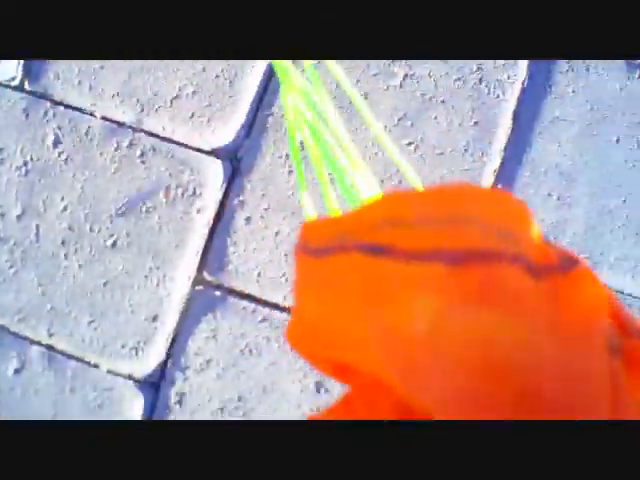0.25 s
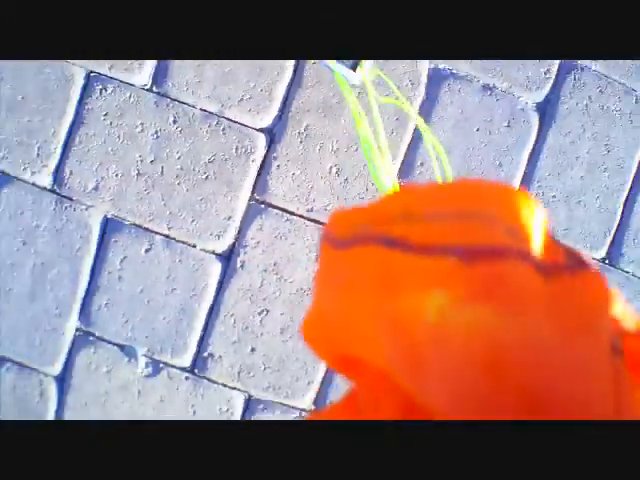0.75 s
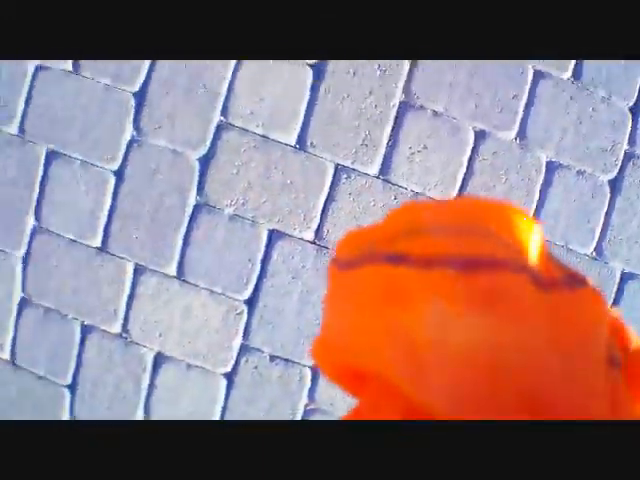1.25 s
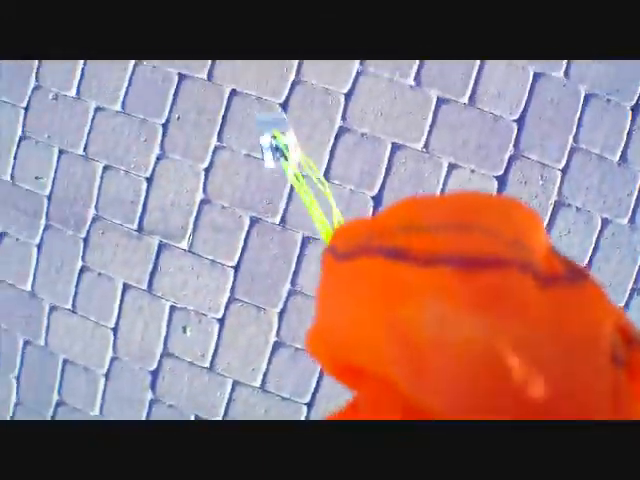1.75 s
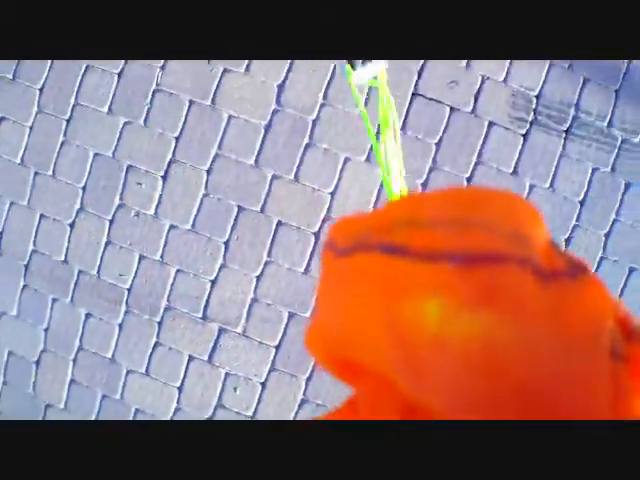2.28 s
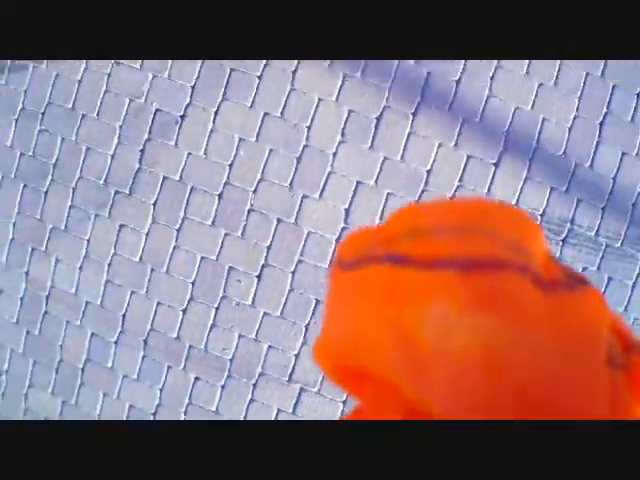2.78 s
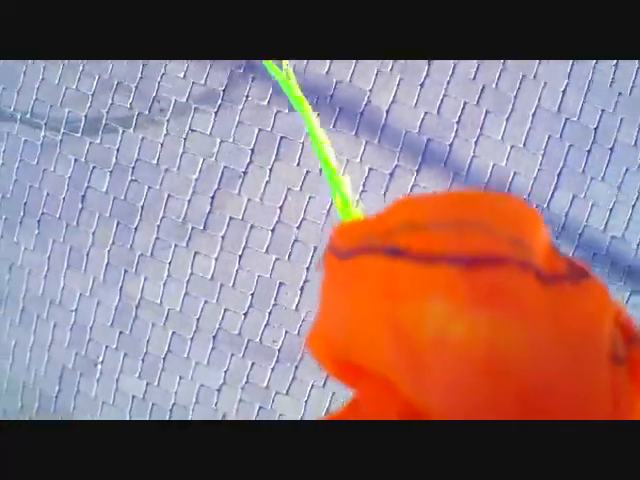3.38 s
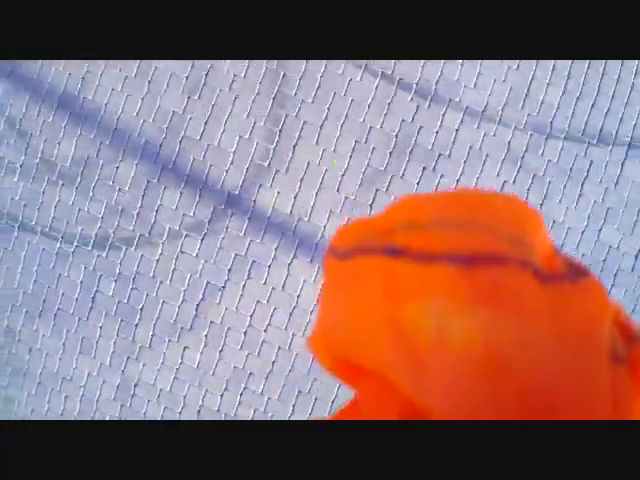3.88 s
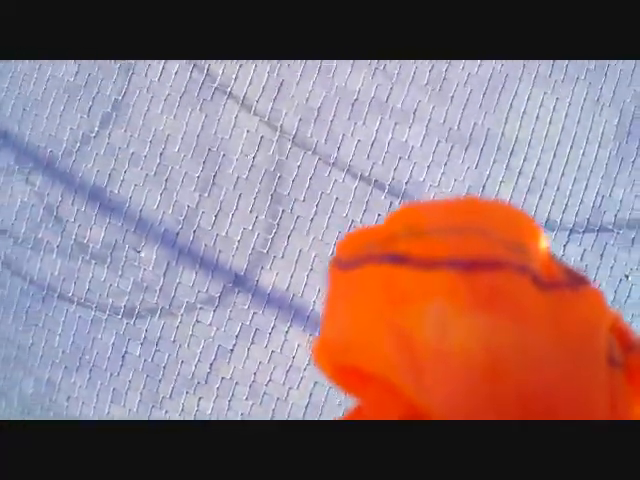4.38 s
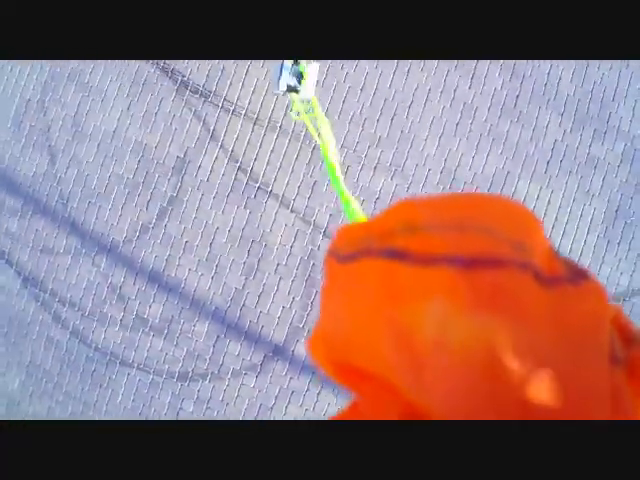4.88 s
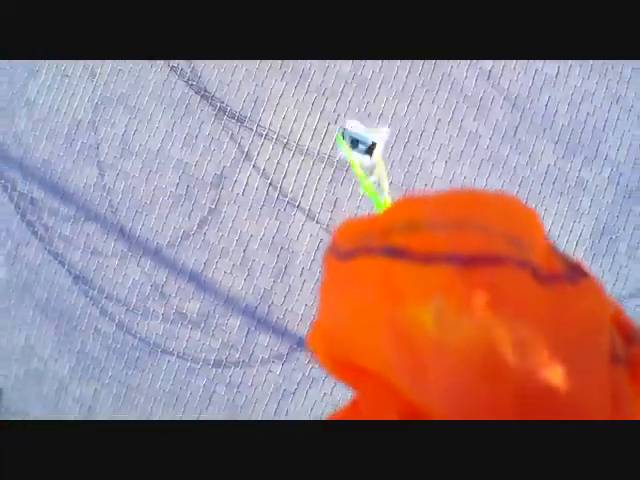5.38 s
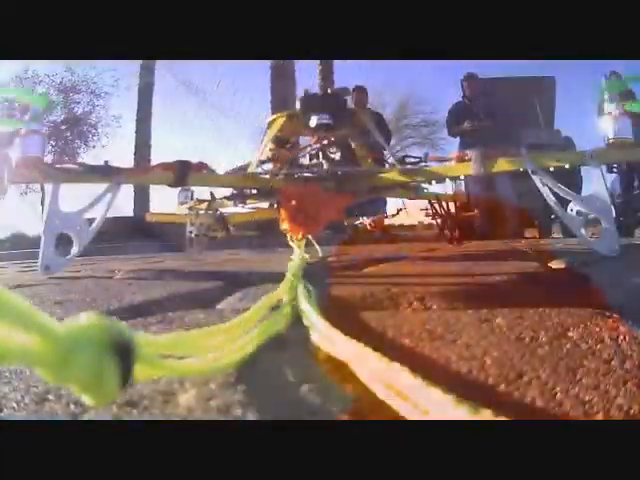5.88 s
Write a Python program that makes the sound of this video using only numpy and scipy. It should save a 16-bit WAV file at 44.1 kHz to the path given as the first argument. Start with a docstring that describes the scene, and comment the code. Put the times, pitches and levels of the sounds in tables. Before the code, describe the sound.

From the first moment a quadcopter is in flight, climbing above a paved yard, heard very close through an overloaded microphone fixed to its body. Four electric motors make a harsh, mid-pitched buzz with a shrill whine above it and little bass. Their pitches waver and beat against each other with small speed corrections, edging slightly upward over the first three to four seconds. Underneath is a fluttering rush and hiss of propellers, and a thin, very high electronic tone sings throughout. The loudness stays even. Two tiny ticks ring in the drone's body at about 0.8 and 5.5 seconds. From about 5.5 seconds the motors fade as a louder, dull, heavily clipped blast of wind takes over, rumbling and buffeting the microphone, with a gust near 5.8 seconds, until the sound ends just after 6 seconds.

```python
"""A buzzing, whining quadcopter, heard from a camera bolted to it as it climbs from a paved yard.
Four motors sound through the ringing frame over the rush of the blades; their speed controllers
sing near 8 kHz. The recorder holds the level and is overloaded throughout.
At the end the flight fades into a dull, hard-clipped blast of wind."""
import sys
import numpy as np
from scipy import signal
from scipy.fft import rfft, irfft
from scipy.io import wavfile
from scipy.ndimage import uniform_filter1d

SR = 44100
rng = np.random.default_rng(int(sys.argv[2]) if len(sys.argv) > 2 else 0)


def inscribe(sig):
    """Save sig as 16-bit PCM at rate SR to the path in sys.argv[1].

    A 1-D sig is mono; a 2-D sig holds one channel per row.
    Samples are clipped to [-1, 1] before scaling.
    """
    pcm = np.round(np.clip(np.atleast_2d(sig).T, -1, 1) * 32767)
    wavfile.write(sys.argv[1], SR, pcm.astype(np.int16))


N = 271079
TIME = np.arange(N) / SR
BINS = np.maximum(np.arange(N // 2 + 1) * SR / N, 1)   # Hz
COMMUTATIONS = 42   # per turn of a shaft


def motor(speed, shaft, whine_db, whine_focus, buzz_db, buzz_db_per_turn, sidebands_db, hum_db):
    """Blade hum and magnetic buzz swell with speed; commutation whine peaks at an arm resonance."""
    # partials, re the hum below the 8th, re the buzz above: (multiple of shaft speed, level [dB])
    partials = [(1, -11), (2, -0.5), (3, -12), (4, -3), (5, -8), (6, -16), (7, -15.5), (10, -21.5),
                (11, -19), (12, -16.5), (13, 0), (14, -7.5), (15, -8), (16, -18), (17, -43), (18, -12.5),
                (28, -14.5)]
    flutter = [from_db(drift(9.7)) for _ in range(3)]
    effort = speed - 85   # turns per s above hover
    hum = from_db(hum_db + 0.53 * effort)
    buzz = from_db(buzz_db + buzz_db_per_turn * effort)
    tones = 0
    for i, (order, db) in enumerate(partials):
        # the buzz centres on the 13th multiple; an unbalanced rotor adds the others
        level = hum if order < 8 else buzz * arm_gain(order * speed) * from_db(sidebands_db * (order != 13))
        tones += level * from_db(db) * flutter[i % 3] * partial(order, shaft)
    sweep = resonance(COMMUTATIONS * speed, centre_hz=3612, width_hz=366) ** whine_focus
    throb = 1 + 0.12 * turning_load(shaft)
    whine = from_db(whine_db + 2 * drift(3.1)) * sweep * throb * np.sin(COMMUTATIONS * shaft)
    return np.sqrt(2) * (tones + whine)


def rotor(curve, hunting=0.000914):
    """Shaft speed and angle: inertia rounds the changes, the flight controller hunts a little."""
    speed = np.interp(TIME, *np.transpose(curve))
    speed = uniform_filter1d(speed, size=SR // 12, mode="nearest")
    speed *= 1 + hunting * drift(8.76)
    return speed, angle(speed)


def turning_load(shaft):
    """The load swings once a turn with the shaft and twice with its two blades."""
    return np.sin(shaft) + np.sin(2 * shaft)


def arm_gain(hz):
    """The bending arms lift each partial that passes through one of their modes."""
    # bending modes: (frequency [Hz], width [Hz], added gain [dB])
    modes = [(907, 150, 5), (1229, 65, 5.5), (1302, 29, -5.5)]
    return 1 + sum(from_db(db) / (1 + (2 * (hz - centre) / width) ** 2) for centre, width, db in modes)


def blade_rush(shafts, chop=0.093, easing_db_per_s=0.01):
    """Turbulence rushes in bands and the tips hiss, both chopped by the passing blades."""
    # bands of the rush: frame resonances, plus a band of overload distortion near 4.7 kHz:
    # (frequency [Hz], width [Hz], level [dB])
    rush_bands = [(1280, 160, 0.5), (1486, 47, -0.5), (1650, 47, -1), (1888, 190, -5.5), (2317, 420, -9.5),
                  (2510, 52, -8), (2692, 71, -7), (3070, 270, -13.5), (3590, 316, -5), (4150, 340, -17),
                  (4704, 386, -9.5)]
    # spectrum of the blade tips: (frequency [Hz], level [dB])
    tip_spectrum = [(500, -54), (1500, -15.5), (3000, 10), (5000, -0.5), (8000, 10), (15000, -27)]
    power = sum((from_db(db) * resonance(BINS, hz, width * np.sqrt(2)) ** 2) ** 2
                for hz, width, db in rush_bands)
    stiffness = 1 / np.sqrt(1 + (1050 / BINS) ** 12)   # the frame barely rings in the lows
    rush = from_db(-39) * coloured(np.sqrt(power) * stiffness)
    hiss = from_db(-53) * coloured(slope(tip_spectrum))
    beats = rms_one(np.exp(chop * sum(np.sin(s) + np.cos(2 * s) for s in shafts)))
    return from_db(-easing_db_per_s * TIME) * (rush + hiss) * beats


def controllers(shaft_a, shaft_b, sag_hz_per_s=3.2, jitter_rad=0.2):
    """Four switching tones sag slowly, beat, jitter in phase and ripple with the load on shaft b."""
    # upper and lower switching tones: (starting frequency [Hz], waver [Hz])
    switching = [(8048.5, 1.2), (7709, 1.8)]
    upper, lower = [angle(hz - sag_hz_per_s * TIME + waver * drift(8.4)) + jitter_rad * drift(45)
                    for hz, waver in switching]
    # the other two run just below the lower tone: one fast beat, one slow
    third = lower - angle(19 + 2 * drift(3))
    fourth = lower - angle(4.2 + drift(2))
    cluster = from_db(-4 + 2 * drift(6)) * np.sin(third + jitter_rad * drift(45))
    cluster += np.sin(lower) + from_db(-9) * np.sin(fourth)
    # switching mixes with commutation: tones that fall as their motor speeds up
    cluster += from_db(-15.5) * np.sin(lower - COMMUTATIONS * shaft_a)
    cluster += from_db(-9) * np.sin(third - COMMUTATIONS * shaft_b)
    tones = from_db(-44) * np.sin(upper) + from_db(-46) * cluster
    return np.sqrt(2) * tones * (1 + 0.042 * turning_load(shaft_b))


def wind(onset_s, eddy_rise_db_per_s=12, gust_width_s=0.035):
    """Buffeting slams the microphone from rail to rail; gusts of finer eddies grow on top."""
    # spectrum of the slow buffeting: (frequency [Hz], level [dB])
    buffet_spectrum = [(15, -3), (30, -5.5), (44, 1), (60, 1.5), (85, 0.5), (125, -2.5), (210, -10.5),
                       (600, -46.5)]
    # spectrum of the fine eddies: (frequency [Hz], level [dB])
    eddy_spectrum = [(80, -15), (200, 4), (480, -1), (700, -16.5), (1000, -11.5), (1400, -15),
                     (2200, -21.5), (3800, -27)]
    # single gusts: (time [s], eddy boost [dB])
    gusts = [(5.78, 4.5), (6.048, 1.5)]
    buffet = coloured(slope(buffet_spectrum))
    buffet /= np.sqrt(uniform_filter1d(buffet ** 2, size=SR // 14) + 1e-9)   # the blast never lets up
    swell_db = eddy_rise_db_per_s * np.maximum(TIME - onset_s, 0)
    swell_db += sum(db * np.exp(-((TIME - s) / gust_width_s) ** 2) for s, db in gusts)
    eddies = coloured(slope(eddy_spectrum)) * from_db(-11.5 + swell_db + 1.5 * drift(24))
    surge = from_db(2 + 3.5 * drift(25))
    clipped = 0.33 * overload(surge * buffet + eddies, top=0.99, hardness=3.3)
    drooping = high_pass(clipped, hz=11)   # the flat tops droop through the input capacitor
    return low_pass(drooping, hz=3850)


def rasp(speed, shaft, critical_turns_per_s=80.2, width_turns_per_s=0.55):
    """Near a critical speed a cluster of high partials flares up just above the whine."""
    # rasp partials: (multiple of shaft speed, level [dB])
    partials = [(53, -5), (55, 0), (56, -5), (57, -9)]
    nearness = np.exp(-((speed - critical_turns_per_s) / width_turns_per_s) ** 2)
    cluster = sum(from_db(db) * partial(order, shaft) for order, db in partials)
    return np.sqrt(2) * from_db(-47.5) * nearness * cluster


def downwash(leave_s=0.86):
    """Air hits the paving at lift-off; only a trace of it is heard aloft."""
    # spectrum of the wash: (frequency [Hz], level [dB])
    spectrum = [(30, 13), (100, -6), (220, -5), (400, 2), (700, 3), (1100, 4.5), (3000, -13)]
    level = from_db(-49) / (1 + (TIME / leave_s) ** 4) + from_db(-88)
    return level * coloured(slope(spectrum))


def knocks(ring_hz=3650, decay_s=0.008):
    """Each small knock rings the frame for a moment."""
    # knocks in the frame: (time [s], level [dB])
    hits = [(.793, -26), (5.548, -28)]
    ages = [(np.maximum(TIME - s, 0), db) for s, db in hits]
    return sum(from_db(db) * np.exp(-age / decay_s) * np.sin(2 * np.pi * ring_hz * age)
               for age, db in ages)


def level_held(x, target_db=-34, listen_s=0.04):
    """Automatic gain: when the tones swell, everything else ducks."""
    keep = np.exp(-1 / (listen_s * SR))
    opening_power = np.mean(x[:SR // 4] ** 2)
    power, _ = signal.lfilter([1 - keep], [1, -keep], x ** 2, zi=[opening_power])
    return from_db(target_db) * x / np.sqrt(power)


def overload(x, top, hardness):
    """Peaks flatten against a ceiling."""
    return x / (1 + np.abs(x / top) ** hardness) ** (1 / hardness)


def from_db(db):
    """Decibels to gain."""
    return 10 ** (np.asarray(db) / 20)


def rms_one(x):
    """Scale to unit power."""
    return x / np.sqrt(np.mean(x ** 2) + 1e-20)


def coloured(gain):
    """Noise shaped by a gain at each frequency; rms 1."""
    return rms_one(irfft(rfft(rng.standard_normal(N)) * gain, N))


def slope(points):
    """Gain at each frequency from a short spectrum."""
    hz, db = np.transpose(points)
    return from_db(np.interp(np.log(BINS), np.log(hz), db))


def drift(hz):
    """Random wander, mostly slower than hz; rms 1."""
    return coloured(1 / (1 + (BINS / hz) ** 2))


def resonance(hz, centre_hz, width_hz):
    """Gain of one resonant band, 1 at its peak."""
    return 1 / np.sqrt(1 + ((hz ** 2 - centre_hz ** 2) / (hz * width_hz)) ** 2)


def angle(hz):
    """Running phase of something that turns at this rate."""
    return 2 * np.pi * np.cumsum(hz) / SR + rng.uniform(0, 2 * np.pi)


def partial(order, shaft):
    """A sine locked to a multiple of the shaft speed."""
    return np.sin(order * shaft + rng.uniform(0, 2 * np.pi))


def low_pass(x, hz):
    """Steep cut above hz."""
    return signal.sosfilt(signal.ellip(10, .2, 80, hz, fs=SR, output="sos"), x)


def high_pass(x, hz):
    """Gentle loss of bass below hz."""
    return signal.sosfilt(signal.butter(1, hz, "high", fs=SR, output="sos"), x)


def scene(wind_onset_s=5.533, fade_s=0.71):
    """The levelled, overloaded flight gives way to the wind in a straight cross-fade."""
    # shafts of the two near and two far motors: (time [s], speed [turns/s])
    near_a = [(0.0, 81.2), (0.16, 81.8), (0.31, 80.96), (0.53, 86.47), (0.74, 85.37), (0.97, 88.62),
              (1.26, 83.41), (1.88, 82.92), (2.26, 89.92), (2.55, 90.43), (2.98, 87.81), (3.17, 89.95),
              (3.4, 88.59), (3.82, 91.58), (4.59, 87.96), (4.85, 86.38), (5.24, 90.1), (5.7, 89.23)]
    near_b = [(0.0, 76.48), (0.28, 78.04), (0.8, 78.43), (0.99, 75.32), (1.47, 82.05), (1.98, 82.05),
              (2.18, 80.47), (2.54, 81.19), (2.71, 80.0), (3.11, 85.47), (3.46, 85.71), (3.7, 83.2),
              (3.84, 82.8), (3.97, 81.25), (4.57, 82.1), (4.81, 83.22), (5.7, 81.05)]
    far_c = [(0, 84), (.45, 83), (.67, 80.7), (1.3, 86), (2.4, 88.5), (4, 89.3), (4.3, 85.5), (5.1, 88),
             (5.7, 85.5)]
    far_d = [(0, 85), (1, 87), (1.3, 85.5), (1.85, 86.3), (2.17, 84.3), (2.6, 86), (3.4, 91), (4.6, 87),
             (5.7, 89.2)]
    speed_a, shaft_a = rotor(near_a)
    speed_b, shaft_b = rotor(near_b)
    flight = motor(speed_a, shaft_a, whine_db=-47, whine_focus=1.24,
                   buzz_db=-46.5, buzz_db_per_turn=0.73, sidebands_db=0.5, hum_db=-60.5)
    flight += motor(speed_b, shaft_b, whine_db=-37, whine_focus=3.8,
                    buzz_db=-45, buzz_db_per_turn=0.87, sidebands_db=-7.5, hum_db=-72)
    flight += motor(*rotor(far_c, hunting=0.003), whine_db=-52.5, whine_focus=2,
                    buzz_db=-58.5, buzz_db_per_turn=0.2, sidebands_db=3, hum_db=-65)
    flight += motor(*rotor(far_d, hunting=0.001988), whine_db=-51, whine_focus=2.2,
                    buzz_db=-58.5, buzz_db_per_turn=0, sidebands_db=3, hum_db=-63)
    flight += blade_rush([shaft_a, shaft_b]) + downwash()
    flight += controllers(shaft_a, shaft_b) + rasp(speed_b, shaft_b) + knocks()
    flight = overload(level_held(flight), top=0.031, hardness=31)
    flight = from_db(-1.5) * high_pass(flight, hz=184)
    fade = np.clip((TIME - wind_onset_s) / fade_s, 0, 1)
    return ((1 - fade) * flight + fade * wind(wind_onset_s))[None]


def record(dry):
    """The highest treble is cut."""
    return low_pass(dry, hz=15250)


dry = scene()
out = record(dry)
inscribe(out)
```